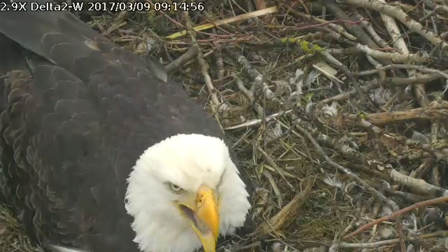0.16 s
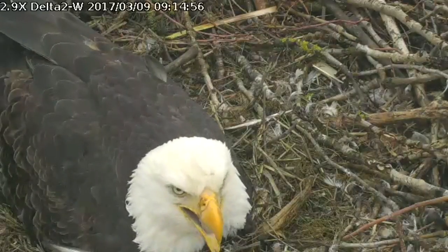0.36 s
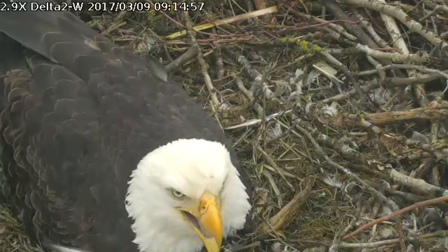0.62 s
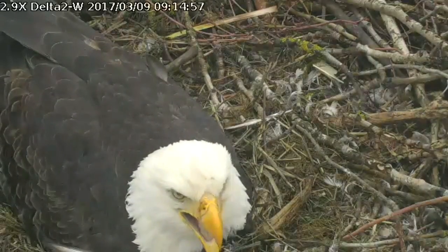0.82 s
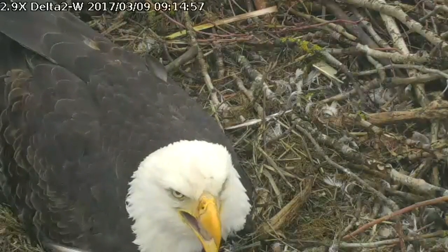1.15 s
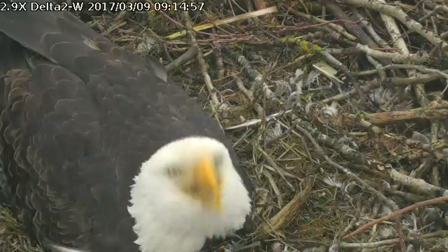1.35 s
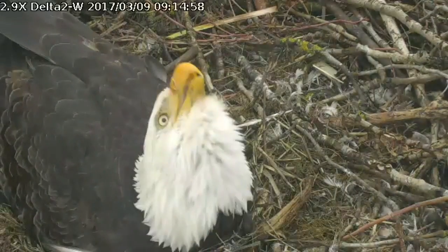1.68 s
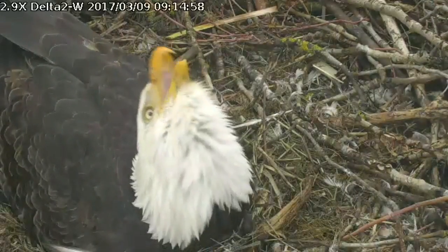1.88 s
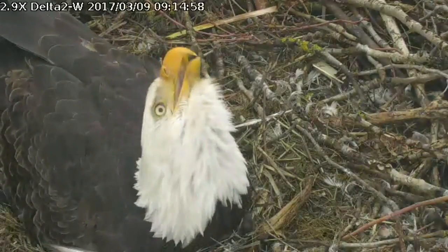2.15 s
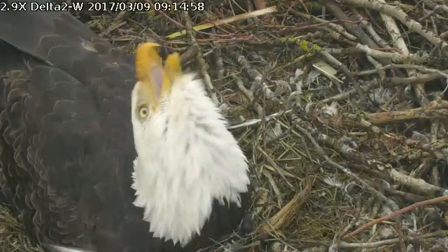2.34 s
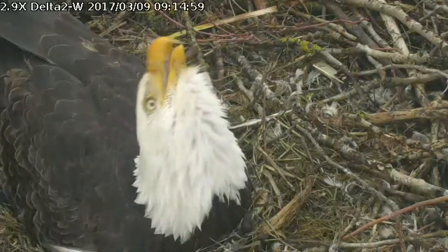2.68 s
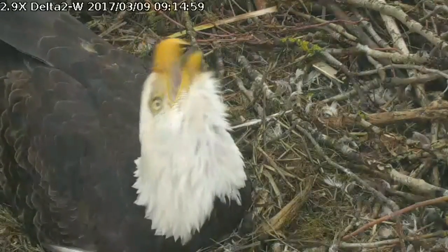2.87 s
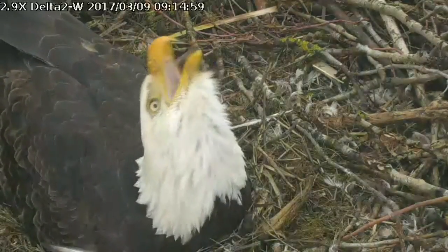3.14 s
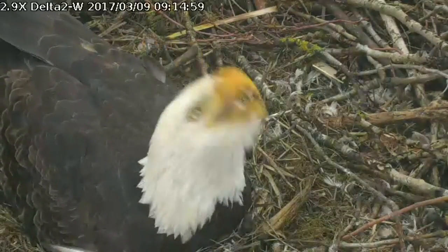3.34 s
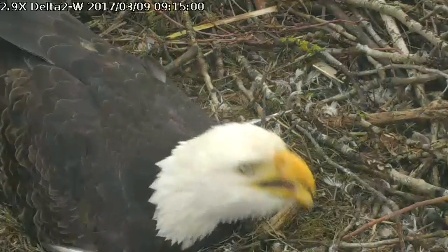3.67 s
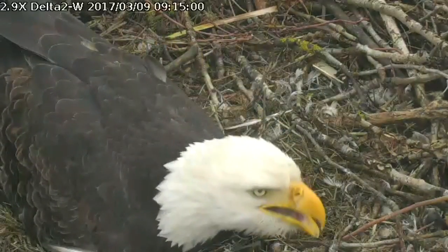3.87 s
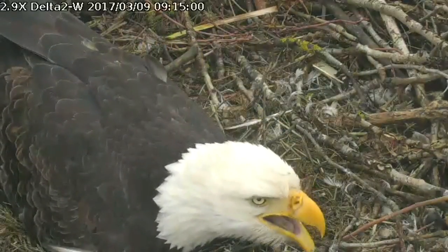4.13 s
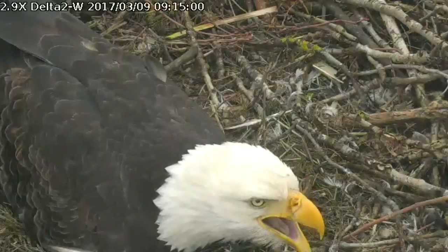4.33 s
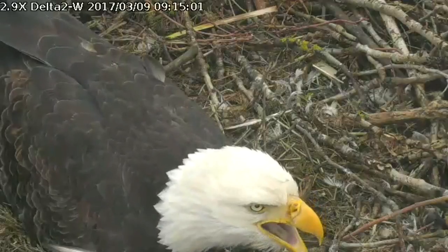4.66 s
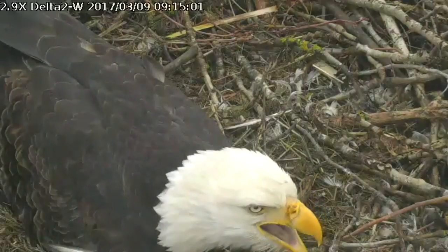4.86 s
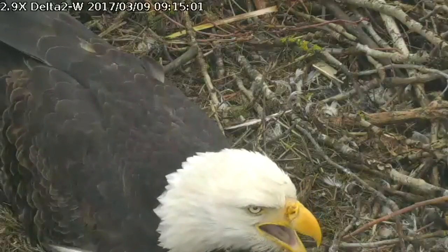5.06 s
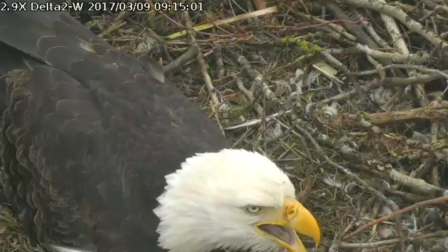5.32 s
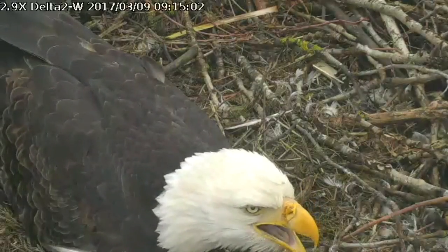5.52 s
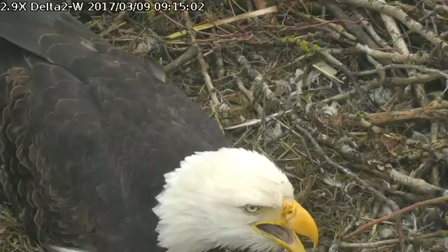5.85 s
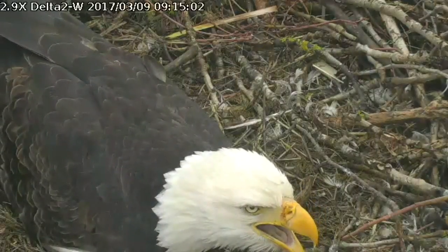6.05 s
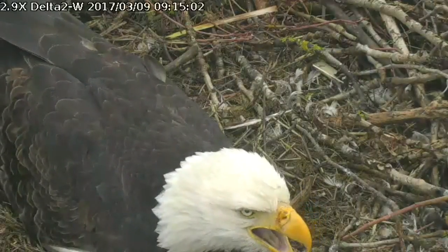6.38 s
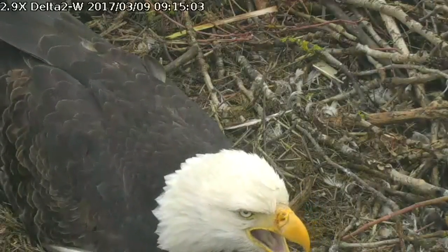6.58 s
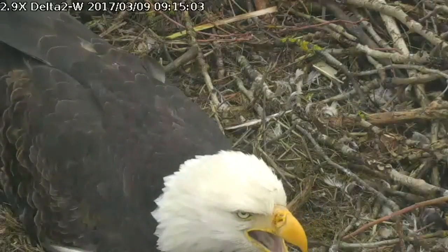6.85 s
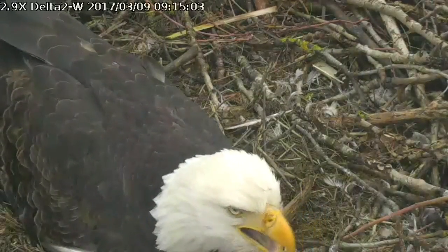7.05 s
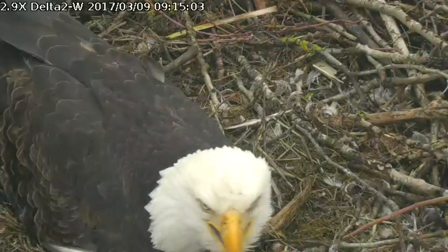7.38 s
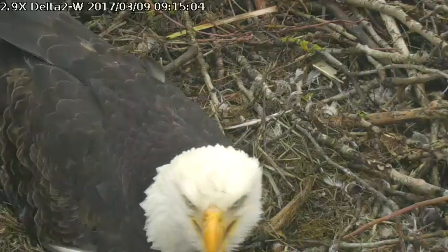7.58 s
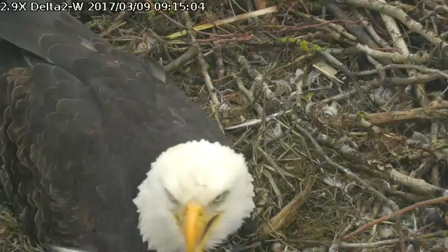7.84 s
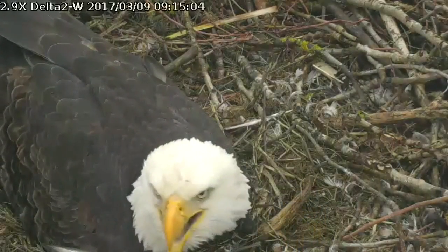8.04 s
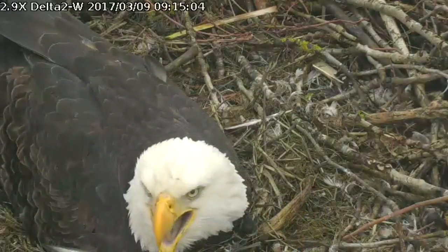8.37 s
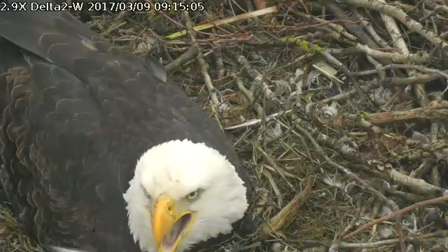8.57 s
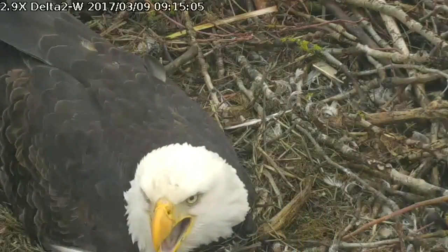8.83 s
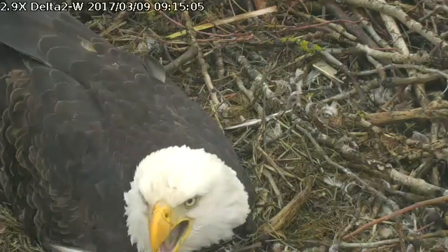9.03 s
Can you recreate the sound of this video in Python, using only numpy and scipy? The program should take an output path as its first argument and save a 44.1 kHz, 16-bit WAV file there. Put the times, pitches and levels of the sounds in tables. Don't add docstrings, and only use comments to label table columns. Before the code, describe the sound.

A steady low mains hum, a dull distant wash with a faint buzz, and soft lumpy wind rumble run for about nine seconds, heard through an outdoor camera microphone with limited, slightly watery treble. From about 0.7 s a bald eagle on its nest gives five hoarse squawks, near 0.7, 1.2, 1.6, 2.0 and 2.4 s. Each starts as a thin high whistle that leaps up, then cracks into a rough, clicking croak with hissing air; small grunts precede the later ones. The bird is quiet until 3.6 s, when three quick, sharp, fluttering chirps fall in pitch until 3.95 s, as wind bumps the microphone. A softer, lower run comes at 5.7-6.1 s. After another pause, a faint grunt at 8.0 s leads into the loudest run, clear piercing chirps until 8.5 s, then single short notes at 8.6 and 8.8 s. Hum and wash continue to the end.

```python
import sys
import numpy as np
from scipy import signal
from scipy.io import wavfile
from scipy.ndimage import uniform_filter1d

SR = 44100
rng = np.random.default_rng(int(sys.argv[2]) if len(sys.argv) > 2 else 0)


def pcm_store(signal):
    levels = np.round(np.clip(np.atleast_2d(signal), -1, 1) * 32767)
    wavfile.write(sys.argv[1], SR, levels.astype(np.int16).T)


def gain_from_db(level_db):
    decades = np.asarray(level_db, float) / 20
    return 10 ** decades


N = 406155
MAINS_HZ = 59.97

HUM_LEVELS = [-35, -43, -53, -57, -62, -62, -65, -64, -76]
# time_s [s], level_db [dB]
WIND = [(0.0, -50), (1.82, -47), (2.25, -48), (2.46, -42), (2.72, -63), (2.95, -41), (3.36, -62),
        (3.61, -33), (3.95, -34.5), (4.36, -44.5), (5.41, -44.5), (6.03, -48), (6.75, -39), (6.87, -47),
        (7.57, -44), (8.34, -47), (9.21, -40.5)]
# pitch_hz [Hz], density_db [dB per Hz]
EARLY_WASH = [(70, -2), (125, -9.5), (250, -11), (540, -8), (720, -9), (860, -6), (1300, -12.5),
              (2700, -16), (3100, -10.5), (3500, -20.5), (4200, -27.5), (5000, -37), (6900, -41),
              (7100, -77)]
# pitch_hz [Hz], density_db [dB per Hz]
LATE_WASH = [(70, -10), (125, -13), (250, -12), (540, -12.5), (720, -11.5), (860, -11), (1400, -10),
             (2000, -17.5), (2750, -16.5), (3100, -11.5), (3500, -18), (4200, -26.5), (5000, -37),
             (6900, -41), (7100, -75.5)]
# time_s [s], late_share [0-1]
WASH_TURN = [(0, 0), (1.499, 0), (3, 0.05), (4.501, 0.1), (6.499, 0.5), (9.21, .8)]
# pitch_hz [Hz], likeness [0-1]
WASH_LIKENESS = [(50, 0.51), (300, 0.93), (1000, 0.9), (2000, 0.86), (3100, 0.83), (4200, 0.96),
                 (6500, 0.7)]
SPIKES = [
    (.1755, -1),
    (.4575, .7),
    (.6795, 1),
    (.9585, -.75),
]
# pitch_hz [Hz], level_db [dB]
BUZZ_COLOUR = [(2400, -100), (3400, -80), (4300, -80), (6900, -85)]
# start_s [s], crack_s [s, voice breaks], jump_hz [Hz, whistle leaps to],
# croak_db [dB], hiss_db [dB]
SQUAWKS = [
    (0.738, .799, 4654, -31.5, -31),
    (1.181, 1.247, 5810, -32, -44),
    (1.62, 1.651, 6080, -32, -40.5),
    (2.028, 2.052, 6350, -33, -39),
    (2.434, 2.484, 6040, -32.5, -34),
]
# start_s [s], level_db [peak dB], pitch_hz [Hz]
SNAPS = [(0.7985, -24, 1410), (0.8444, -30, 1330), (0.852, -25, 2000), (1.2471, -33, 1460),
         (1.2654, -30, 2140), (1.288, -21.5, 1900), (1.3018, -23.5, 2170), (1.314, -29, 1500),
         (1.6513, -25, 1220), (1.6784, -27, 1850), (1.6948, -24, 1700), (1.7095, -26, 2100),
         (2.052, -28, 1480), (2.0785, -26, 2090), (2.0943, -24, 1830), (2.1085, -25.5, 1780),
         (2.4788, -23, 1700), (2.5016, -29, 2020), (2.5232, -27, 1500), (2.5385, -25, 2030)]
# peak_s [s], pitch_hz [Hz], level_db [peak dB], length_ms [ms]
KNOTS = [(0.8035, 3210.0, -24.5, 3.8), (0.807, 3420.0, -24.0, 4.9), (0.8148, 2980.0, -30.5, 2.8),
         (0.8217, 3270.0, -18.5, 3.8), (0.8251, 3330.0, -23.0, 4.5), (0.8309, 3220.0, -24.0, 4.3),
         (0.8347, 3160.0, -28.5, 2.9), (0.8392, 3020.0, -23.0, 3.7), (0.8444, 2990.0, -23.5, 4.0),
         (0.8492, 3020.0, -28.0, 7.1), (0.8529, 3150.0, -25.0, 5.6), (0.8668, 3240.0, -27.5, 4.3),
         (1.251, 3140.0, -23.5, 4.0), (1.2561, 3080.0, -21.0, 5.8), (1.2598, 3030.0, -25.0, 3.8),
         (1.2651, 3360.0, -28.0, 3.4), (1.2702, 3120.0, -18.5, 5.0), (1.2733, 3080.0, -16.5, 5.6),
         (1.2766, 3150.0, -25.5, 4.1), (1.2891, 3020.0, -22.0, 3.4), (1.2936, 3010.0, -28.5, 3.9),
         (1.3022, 2880.0, -27.0, 4.4), (1.3073, 3020.0, -27.0, 8.1), (1.6567, 3060.0, -26.0, 10.3),
         (1.6605, 3130.0, -26.0, 3.7), (1.6644, 3060.0, -21.5, 5.1), (1.6697, 3010.0, -28.0, 5.3),
         (1.6753, 3120.0, -24.5, 3.2), (1.6786, 3190.0, -23.0, 4.3), (1.6813, 3130.0, -25.0, 2.9),
         (1.6861, 3180.0, -24.0, 4.5), (1.6892, 3020.0, -28.5, 3.4), (1.6956, 3080.0, -20.5, 4.2),
         (1.7005, 3120.0, -22.5, 4.9), (1.7102, 3120.0, -19.5, 3.3), (1.7149, 2990.0, -25.0, 6.5),
         (2.0627, 3310.0, -28.0, 3.8), (2.0798, 3220.0, -24.5, 4.1), (2.0954, 3100.0, -28.5, 3.1),
         (2.4837, 2900.0, -27.0, 3.6), (2.4871, 3180.0, -23.5, 5.4), (2.49, 3390.0, -22.0, 3.7),
         (2.4988, 3240.0, -26.0, 3.5), (2.5033, 3180.0, -18.0, 5.4), (2.5061, 3200.0, -19.5, 5.2),
         (2.5097, 3080.0, -23.5, 7.7), (2.5188, 3140.0, -30.0, 9.1), (2.5239, 3060.0, -26.0, 7.5),
         (2.539, 3130.0, -27.0, 3.0), (2.5526, 3120.0, -29.5, 7.5)]
# peak_s [s], pitch_hz [Hz], level_db [peak dB], length_ms [ms]
SCRATCHES = [(0.8015, 1450, -28, 9), (0.8125, 2750, -27, 9), (0.8195, 3600, -24, 4), (0.858, 3500, -29, 5),
             (1.6535, 1400, -29, 7), (2.4805, 2100, -28, 5), (2.485, 1300, -29, 6), (2.49, 2300, -30, 4),
             (2.545, 2100, -32, 6), (2.068, 2100, -31, 5), (0.7418, 4750, -24, 6), (0.805, 4300, -23, 4),
             (0.8155, 4500, -26, 4), (0.8206, 4200, -28, 3), (0.8255, 4100, -28, 3), (1.1822, 3150, -27, 4),
             (1.2545, 4400, -27, 5), (1.2626, 4200, -29, 5), (1.267, 3650, -22, 4), (1.2742, 4100, -26, 4),
             (1.281, 4400, -31, 5), (1.2895, 4300, -31, 3), (1.6535, 3000, -25, 5), (1.6647, 4200, -31, 4),
             (1.7098, 4200, -32, 3), (1.732, 3100, -30, 6), (2.0315, 6100, -24, 4), (2.0565, 2600, -29, 5),
             (2.085, 3100, -29, 4), (2.106, 3100, -29, 4), (2.1146, 3300, -31, 4), (2.1304, 3200, -32, 4),
             (2.4035, 4100, -32, 5), (2.4915, 4300, -29, 4), (2.497, 3750, -26, 5)]
# peak_s [s], level_db [dB], throat_hz [Hz]
GRUNTS = [
    (1.159, -44.5, 3450),
    (1.6, -40.5, 3340),
    (1.995, -33, 3470),
    (2.403, -31.5, 3150),
    (7.984, -41, 3900),
]
# start_s [s], end_s [s], level_db [dB]
AIRS = [
    (3.482, 3.598, -61),
    (3.978, 4.102, -64.5),
    (5.516, 5.672, -64.5),
    (7.82, 7.943, -63.5),
]
# start_s [s], length_ms [ms], from_hz [Hz], level_db [peak dB]
SWEEPS = [
    (3.658, 15, 4880, -26),
    (3.779, 15, 5160, -28),
    (3.917, 9, 4070, -29.5),
    (5.722, 14.3, 4190, -28),
    (5.845, 12, 4380, -31),
    (5.977, 11, 3840, -31),
    (8.060, 17, 5415, -23),
    (8.172, 17, 5560, -25),
    (8.300, 16, 5370, -20),
    (8.443, 12, 4430, -29),
]
# start_s [s], length_ms [ms], from_hz [Hz], level_db [peak dB]
SLIDES = [
    (3.644, 14, 3470, -28),
    (8.049, 14, 4100, -24),
]
# peak_s [s], pitch_hz [Hz], level_db [peak dB], length_ms [ms]
STEPS = [(3.6746, 5020, -15, 7), (3.6695, 3790, -21, 6), (3.6919, 3600, -25.5, 23), (3.786, 4400, -20, 17),
         (3.787, 3970, -19, 19), (3.7915, 3600, -26, 8), (3.7803, 5000, -25, 4), (3.781, 3200, -30, 6),
         (3.8075, 3830, -25, 16), (3.9204, 3760, -27, 9), (3.9227, 3150, -18, 13), (5.72, 3760, -19.5, 8.7),
         (5.7288, 3880, -21, 11), (5.727, 3360, -23, 8), (5.850, 3880, -21.5, 14), (5.849, 3450, -23.5, 12),
         (5.853, 3110, -23.5, 10), (5.8434, 3230, -32, 4), (7.9921, 4258, -32.5, 22),
         (8.0836, 4300, -34, 10), (8.098, 4040, -28.5, 13), (8.18, 4490, -14.5, 11), (8.185, 3460, -17, 8),
         (8.201, 3900, -19, 10), (8.3114, 3665, -16, 15), (8.4485, 3670, -19, 12),
         (8.4483, 3030, -24.5, 17), (8.613, 3900, -27.6, 22)]
# peak_s [s], pitch_hz [Hz], level_db [peak dB], length_ms [ms]
PIPS = [(2.407, 3210, -29, 18.5), (2.396, 2720, -35, 20), (2.41, 3600, -27, 12), (3.656, 4880, -15.5, 8.1),
        (3.798, 4740, -28, 20), (3.813, 3500, -25, 16.4), (5.7335, 3180, -17.5, 8.2),
        (5.741, 4770, -29.5, 9), (5.857, 3200, -33, 10), (5.861, 4720, -25, 8.9), (5.9829, 3020, -19.5, 9),
        (5.992, 4190, -37, 23), (6.132, 3950, -33.5, 18), (7.978, 4340, -34, 12), (8.0615, 5200, -22.5, 6),
        (8.0672, 4440, -15, 12.8), (8.0735, 3520, -18.5, 9.6), (8.079, 5035, -8.5, 14),
        (8.4605, 4295, -23, 18)]
# peak_s [s], pitch_hz [Hz], level_db [peak dB], length_ms [ms]
NOTES = [(1.997, 3520, -23.5, 11), (2.002, 3530, -24.5, 10), (1.994, 2820, -29.5, 20),
         (2.022, 3600, -33, 12), (2.012, 3000, -32, 12), (8.1985, 3325, -14, 7), (2.4, 4950, -36, 15),
         (3.664, 4330, -20, 19), (3.6814, 3480, -19.5, 20), (3.6894, 2800, -33, 15),
         (3.8005, 3480, -34, 20), (3.938, 2720, -32.5, 37), (5.867, 2760, -34, 24), (7.982, 3520, -27, 17),
         (8.0878, 3385, -11, 21), (8.096, 3440, -19, 8), (8.103, 3360, -14, 15), (8.211, 3300, -18, 12),
         (8.1907, 4970, -12, 7.9), (8.199, 3330, -5, 24), (8.2096, 3770, -21, 13), (8.206, 2660, -32, 14),
         (8.3145, 2930, -27, 6), (8.3194, 4700, -13, 12), (8.3249, 3320, -15.5, 18),
         (8.4635, 2610, -26, 18), (8.7688, 3704, -16.5, 17)]
# peak_s [s], pitch_hz [Hz], level_db [peak dB]
OVERTONES = [(3.601, 4900, -47), (3.772, 4900, -47), (3.797, 5500, -42), (5.752, 4850, -46),
             (5.864, 5500, -45), (5.874, 4650, -46), (5.974, 5300, -45), (3.685, 5180, -46),
             (3.921, 6450, -45), (3.938, 5300, -45), (3.940, 4280, -44), (5.985, 5560, -47),
             (8.199, 6750, -30.5), (8.447, 7000, -45.5), (1.99, 6900, -45.5), (3.862, 4800, -56),
             (3.875, 4400, -56), (6.113, 5200, -50), (8.466, 5200, -54)]
# [Hz, highest band kept]
CHOKES = [
    (1.161, 1.177, 4250),
    (1.547, 1.612, 4930),
    (1.93, 2.023, 4750),
    (2.377, 2.426, 5150),
    (3.596, 3.977, 4460),
    (5.663, 6.156, 5450),
    (7.947, 8.847, 5400),
]
# start_s [s], sag_hz [Hz]
RELIEFS = [(3.65, 3850), (3.775, 4200), (3.905, 4800), (5.721, 4850), (5.84, 4720), (5.97, 4540),
           (6.105, 4900), (7.975, 4100), (8.054, 3900), (8.171, 3750), (8.293, 4150), (8.435, 4600),
           (8.57, 4530), (8.745, 4950)]
# start_s [s], end_s [s], low_hz [Hz], high_hz [Hz]
HOLES = [
    (1.205, 1.235, 4100, 5600),
    (1.226, 1.24, 1500, 2400),
    (1.628, 1.648, 1700, 2500),
    (1.636, 1.648, 3700, 5200),
    (2.036, 2.05, 3700, 5200),
    (8.135, 8.165, 1600, 2800),
    (8.268, 8.29, 1400, 2700),
]


def evened(x):
    return x / np.sqrt(np.mean(x ** 2) + 1e-20)


def smooth(x, *sizes):
    for axis, size in enumerate(sizes):
        x = uniform_filter1d(x, size=size, axis=axis)
    return x


def read(points, hz):
    f, value = np.transpose(points)
    return np.interp(np.log(hz + 1), np.log(f + 1), value)


def band(x, lo_hz, hi_hz, order=2):
    return signal.sosfilt(signal.butter(order, [lo_hz, hi_hz], "bandpass", fs=SR, output="sos"), x)


def resonate(x, hz, width_hz):
    turn = np.exp(2j * np.pi * np.cumsum(hz * np.ones(len(x))) / SR)
    r = np.exp(-np.pi * width_hz / SR)
    return 2 * (turn * signal.lfilter([1 - r], [1, -r], x / turn)).real


def sine(hz, jitter):
    waver = evened(smooth(rng.standard_normal(len(hz) + 60), 60)[60:])
    return np.sin(2 * np.pi * (np.cumsum(hz * (1 + jitter * waver)) / SR + rng.random()))


def add(mix, s, sound):
    part = mix[round(s * SR):][:len(sound)]
    part += sound[:len(part)]


def bird(*voices):
    mix = np.zeros(N)
    for voice, table in voices:
        for row in table:
            is_curve = np.ndim(row) == 2
            add(mix, *(voice(row) if is_curve else voice(*row)))
    return mix


def hum():
    t = np.arange(N) / SR
    wobble = 1 + 0.17 * evened(band(rng.standard_normal((2, N)), 2.4, 10))
    lines = [gain_from_db(db) * np.sin(2 * np.pi * ((2 * k + 1) * MAINS_HZ * t + rng.random()))
             for k, db in enumerate(HUM_LEVELS)]
    return wobble * np.sqrt(2) * sum(lines)


def rumble():
    s, db = np.transpose(WIND)
    shared, left, right = evened(band(rng.standard_normal((3, N)), 11, 50, order=3))
    return gain_from_db(np.interp(np.arange(N) / SR, s, db)) * (shared + 0.75 * np.array([left, right]))


def wash():
    frames = N // 256 + 5
    hz = np.fft.rfftfreq(1024, 1 / SR)[:, None]
    a, b, c, d, patches, grit, gaps = rng.standard_normal((frames, 513, 7)).T
    gaps = np.maximum(evened(smooth(gaps, 2, 28)) - .8, 0) * np.clip(hz / 2000 - 1.6, 0, 1)
    grit = evened(uniform_filter1d(grit, size=6, axis=1))
    patches = evened(smooth(patches, 8, 8))
    late = np.clip(np.interp(np.arange(frames) * 256 / SR, *np.transpose(WASH_TURN)), 0, 1)
    colour_db = read(EARLY_WASH, hz) * (1 - late) + read(LATE_WASH, hz) * late
    patch_db = 1.0 + 2.5 * (hz < 170)
    same = np.clip(read(WASH_LIKENESS, hz), -1, 1)
    left = a + 1j * b
    right = same * left + np.sqrt(1 - same ** 2) * (c + 1j * d)
    z = np.array([left, right]) * gain_from_db(colour_db + patch_db * patches + 2.38 * grit - 30 * gaps)
    return gain_from_db(-41) * evened(signal.istft(z, nperseg=1024, noverlap=768)[1][:, :N])


def buzz():
    k = np.arange(40, 117)[:, None]
    place = np.arange(8193) / 8192
    steps = sum(size * np.sin(2 * np.pi * k * (place - at)) for at, size in SPIKES)
    cycle = (gain_from_db(read(BUZZ_COLOUR, k * MAINS_HZ)) * steps).sum(axis=0)
    unsteady = gain_from_db(1.5 * evened(band(rng.standard_normal((2, N)), 3, 30)))
    return unsteady * np.interp(np.arange(N) * MAINS_HZ / SR % 1, place, cycle)


def squawk(start, crack, jump_hz, croak_db, hiss_db):
    foot_hz, top_hz, break_hz, knee_hz, end_hz = 3240, 6750, 6070, 5370, 3470
    throat_hz, sag_hz = 3140, 2990
    jump_s, drop_s = .003, .015
    top = start + .68 * (crack - start)
    middle = (start + top) / 2
    dip_db = -37.5 + .7 * (hiss_db + 40.5)
    whistle = [(start, foot_hz, -30), (start + jump_s, jump_hz, -28),
               (middle, (jump_hz + top_hz) / 2, -37.5), (top, top_hz, dip_db), (crack, break_hz, -24),
               (crack + .59 * drop_s, knee_hz, -32),
               (crack + drop_s, end_hz, -37.5)]
    rough = [(crack - .004, croak_db - 5.5, throat_hz), (crack + .024, croak_db, throat_hz),
             (crack + .086, croak_db - 12, sag_hz)]
    hiss = [(start - .04, hiss_db - 21.5), (start, hiss_db - 14), (start + jump_s, hiss_db - 4),
            (middle, -53), (crack, hiss_db), (crack + .068, -50.5), (crack + .123, -63)]
    return whistle, rough, hiss


def breath(rows):
    s, db = np.transpose(rows)
    t = np.arange(s[0], s[-1], 1 / SR)
    air, puffs = rng.standard_normal((len(t), 2)).T
    hiss = band(air * gain_from_db(4.0 * evened(smooth(puffs, 90))), 3900, 8400)
    return s[0], gain_from_db(np.interp(t, s, db) + 5.5) * evened(hiss) * signal.windows.tukey(len(t), .2)


def arch(rows):
    s, hz, db = np.transpose(rows)
    t = np.arange(s[0], s[-1], 1 / SR)
    hz, db = np.interp(t, s, hz), np.interp(t, s, db)
    broken = gain_from_db(3.5 * evened(smooth(rng.standard_normal(len(t)), 70)))
    tone = broken * sine(hz, jitter=.035)
    half = gain_from_db(np.minimum(-6, -41 - db)) * broken[::-1] * sine(hz / 2, jitter=0.0072) * (hz > 5900)
    return s[0], gain_from_db(db) * (tone + half) * signal.windows.tukey(len(t), .05)


def croak(rows):
    s, *columns = np.transpose(rows)
    t = np.arange(s[0], s[-1], 1 / SR)
    croak_db, throat_hz = (np.interp(t, s, c) for c in columns)
    chance = rng.standard_normal((len(t), 3)).T
    turns = np.cumsum(170 * (1 + .55 * evened(smooth(chance[0], 200)))) / SR
    pulses = np.diff(np.floor(turns), prepend=0) * gain_from_db(1.1 * chance[1])
    puffs = np.exp(-2 * (turns % 1))
    drive = evened(pulses) + 4.3 * evened(puffs * chance[2])
    throat = evened(resonate(resonate(drive, throat_hz, 300), throat_hz, 800))
    edges_hz = [(2300, 4300), (1000, 2200), (3900, 8400), (110, 223)]
    rasp, low, high, thud = (evened(band(drive, *edges)) for edges in edges_hz)
    voice = gain_from_db(-6) * throat + gain_from_db(-3) * rasp + gain_from_db(-7.5) * low + gain_from_db(-7) * high + gain_from_db(-8) * thud
    return s[0], gain_from_db(croak_db) * voice * signal.windows.tukey(len(t), .1)


def snap(s, db, hz):
    t = np.arange(600) / SR
    low = 1.4 * np.exp(-t / .0007) * np.sin(2 * np.pi * hz * t)
    tick = gain_from_db(-13) * np.exp(-t / .0004) * rng.standard_normal(600)
    return s, gain_from_db(db + 6.5) * (low * (1 - np.exp(-t / 0.0004)) + tick)


def held(s, rise_ms, fall_ms, hz, glide, db):
    ms = np.arange(-1.5 * rise_ms, 1.8 * fall_ms, 1000 / SR)
    swell = np.exp(-2.2 * abs(ms / np.where(ms < 0, rise_ms, fall_ms)) ** 1.38)
    shape = swell * signal.windows.tukey(len(ms), .5)
    return s + ms[0] / 1000, gain_from_db(db) * shape * sine(hz + glide * ms, jitter=0.007)


def tones(table, glide):
    rise = .51
    return [(s, rise * ms, (1 - rise) * ms, hz, glide, db) for s, hz, db, ms in table]


def grunt(s, db, hz):
    return [(s - .014, db - 7, hz), (s, db, hz), (s + .03, db - 7, hz)]


def sweep(s, length_ms, from_hz, db, to_hz=2837, depth=1.0):
    t = np.arange(0, length_ms / 1000, 1 / SR)
    hz = np.linspace(from_hz, to_hz, len(t))
    flutter = 1 + depth * np.cos(2 * np.pi * (423 * t + rng.random()))
    skirt = rng.standard_normal(len(t))
    for _ in range(3):
        skirt = resonate(skirt, hz, 900)
    voice = flutter * sine(hz, jitter=0.018) + .5 * depth * evened(skirt)
    return s, gain_from_db(db) * np.hanning(len(t)) ** 0.89 * voice


def spread_noise(x):
    hz, t, z = signal.stft(x, SR, nperseg=512, noverlap=384)
    near = smooth(abs(z) ** 2, 5, 5)
    far = smooth(near, 39, 9)
    level = np.sqrt(abs(gain_from_db(2 * -17.0) * near + gain_from_db(2 * -20.5) * far))
    a, b = rng.standard_normal((2, 2) + z.shape)
    return signal.istft(level * (a + 1j * b), SR, nperseg=512, noverlap=384)[1][:, :N]


def nearby(x):
    t = np.arange(4000) / SR
    tail = rng.standard_normal((4000, 2)).T * gain_from_db(-60 * t / 0.1) * (t > .004)
    return gain_from_db(-19.5) * signal.oaconvolve(x[None], tail / np.linalg.norm(tail[0]), axes=1)[:, :N]


def treble_edge(t):
    edge_hz = np.full(len(t), 7000.)
    for a, b, hz in CHOKES:
        edge_hz = np.where((t > a) & (t < b), hz, edge_hz)
    for s, sag_hz in RELIEFS:
        after = (t > s) & (t < s + .25) & (edge_hz < 6600)
        lifted_hz = np.interp(t - s, [.03, .075], [5930, sag_hz])
        edge_hz = np.where(after, lifted_hz, edge_hz)
    return edge_hz


def choked(x):
    hz, t, z = signal.stft(x, SR, nperseg=512, noverlap=384)
    hz = hz[:, None]
    edge_hz = treble_edge(np.round(t * SR / 512) * 512 / SR)
    blocks = len(t) // 4 + 1
    block_hz = 200 * rng.standard_normal(blocks)
    band_hz = 300 * rng.standard_normal((blocks, 65)).T
    ragged_hz = np.repeat(np.repeat(block_hz + band_hz, 4, axis=0), 4, axis=1)[:len(hz), :len(t)]
    keep = (hz < edge_hz - 200 + ragged_hz) | (edge_hz > 6600)
    holes = sum((t > a) & (t < b) & (hz > lo) & (hz < hi) for a, b, lo, hi in HOLES)
    keep = keep * gain_from_db(-21 * np.minimum(holes, 1))
    return signal.istft(z * keep, SR, nperseg=512, noverlap=384)[1][:, :N]


def scene():
    whistles, croaks, hisses = zip(*(squawk(*row) for row in SQUAWKS))
    knots = [(s, hz, db + 1.5, 1.2 * ms) for s, hz, db, ms in KNOTS]
    rings = tones(knots + SCRATCHES, glide=-40)
    grunts = [grunt(*row) for row in GRUNTS]
    airs = [[(a, db - 8), ((a + b) / 2, db), (b, db)] for a, b, db in AIRS]
    hoarse = bird((arch, whistles), (croak, croaks), (croak, grunts), (breath, hisses), (breath, airs),
                  (snap, SNAPS), (held, rings))
    faint = [(*row, 14) for row in OVERTONES]
    clear = tones(STEPS, glide=-17.5) + tones(PIPS, glide=14) + tones(NOTES + faint, glide=-3.5)
    slides = [(*row, 5500, .25) for row in SLIDES]
    chirps = bird((held, clear), (sweep, SWEEPS + slides))
    around = spread_noise(chirps + hoarse) + nearby(chirps + hoarse)
    return choked(wash() + buzz() + hoarse + around) + chirps + hum() + rumble()


def low_pass(x):
    return signal.sosfilt(signal.butter(12, 7300, fs=SR, output="sos"), x)


def record(dry):
    lag = np.array([[2.8], [0]])
    offset = [[.045], [.025]]
    taps = np.arange(-255, 256)
    edge = 2 * 7150 / SR
    kernels = edge * np.sinc(edge * (taps - lag)) * np.kaiser(511, 9)
    mix = signal.oaconvolve(dry, kernels, "same", axes=1) + offset
    return low_pass(mix)


dry = scene()
out = record(dry)
pcm_store(out)
```